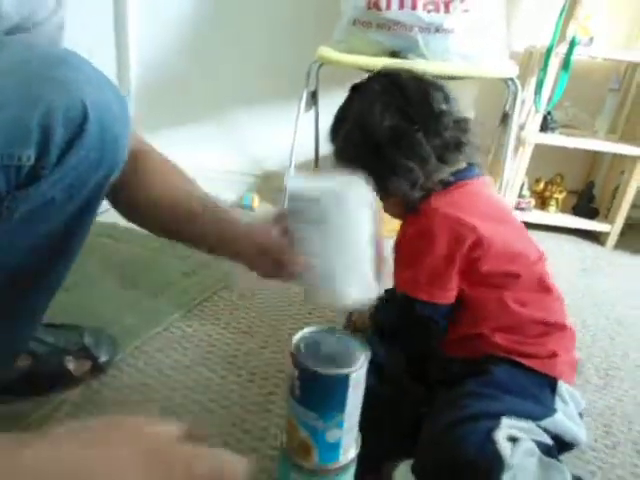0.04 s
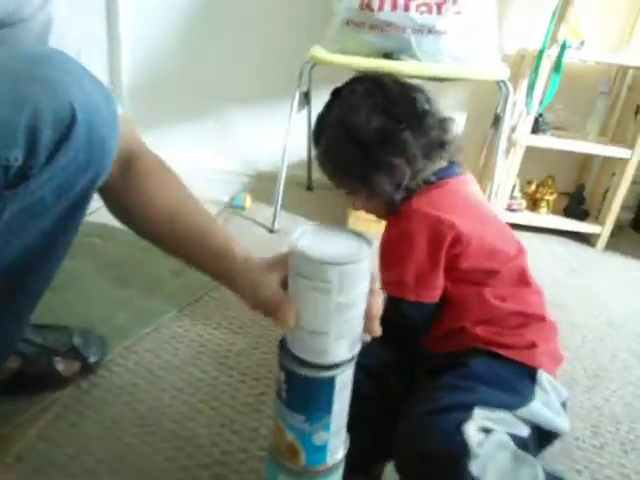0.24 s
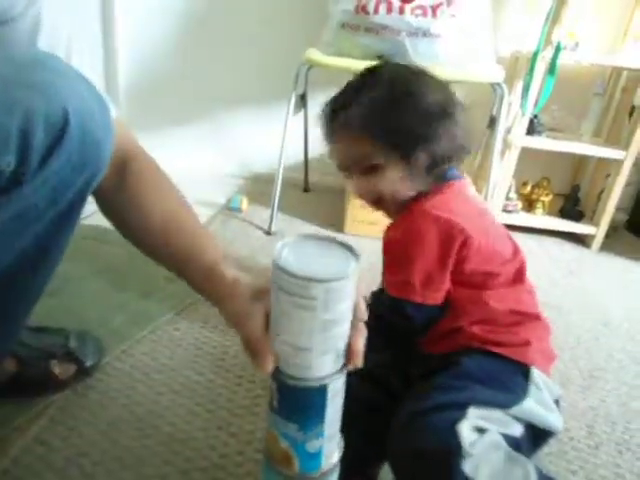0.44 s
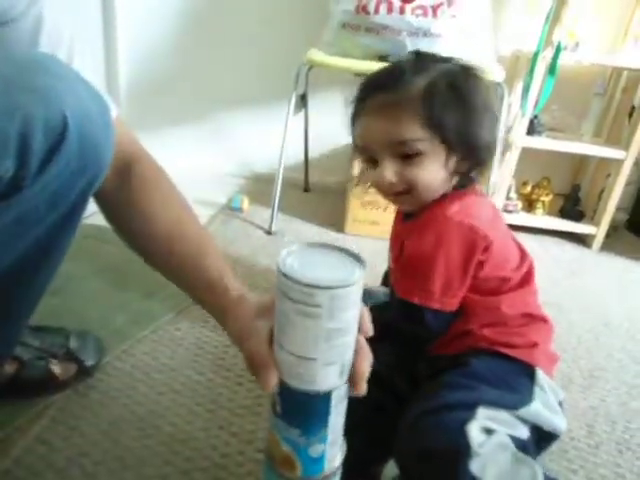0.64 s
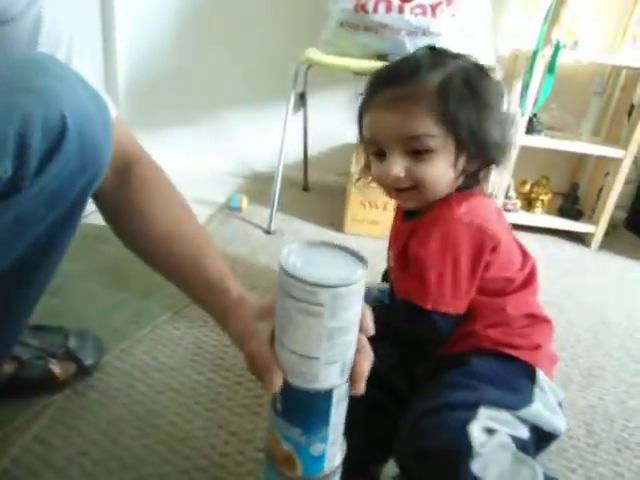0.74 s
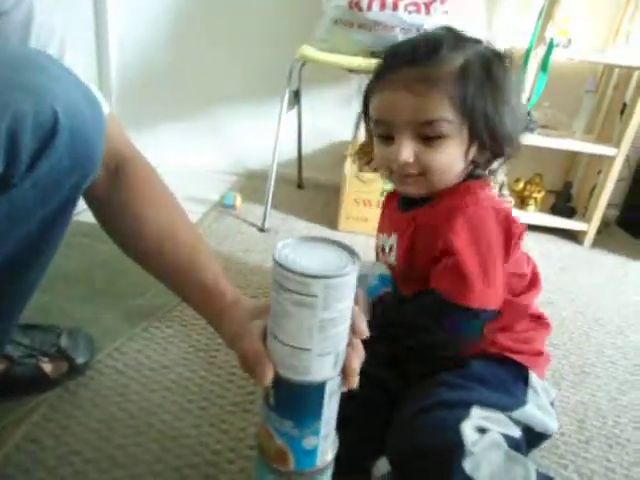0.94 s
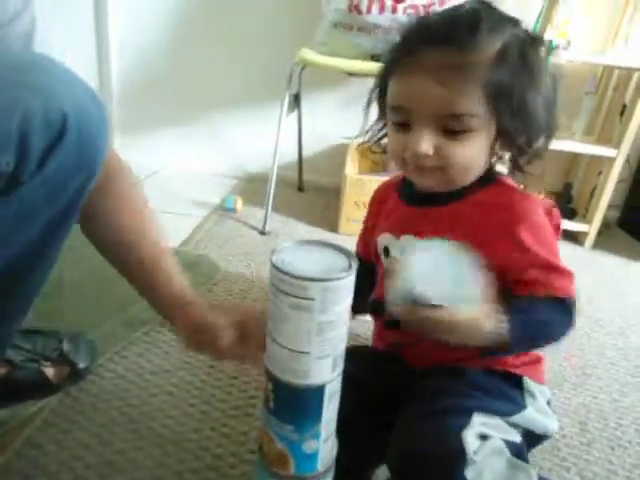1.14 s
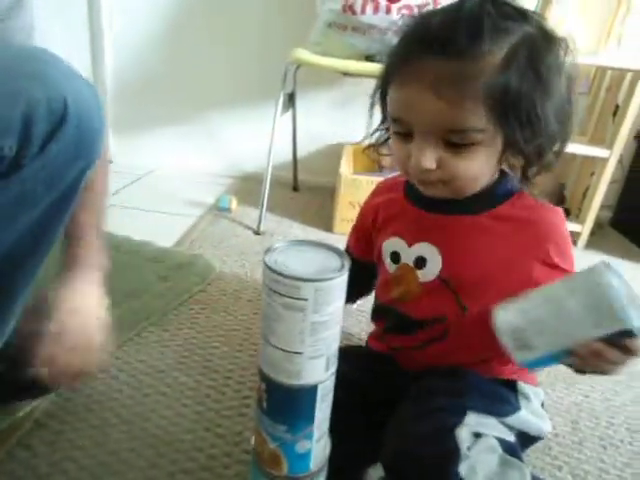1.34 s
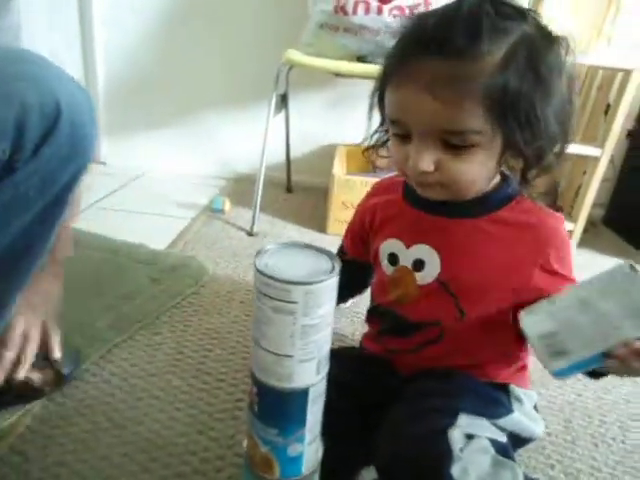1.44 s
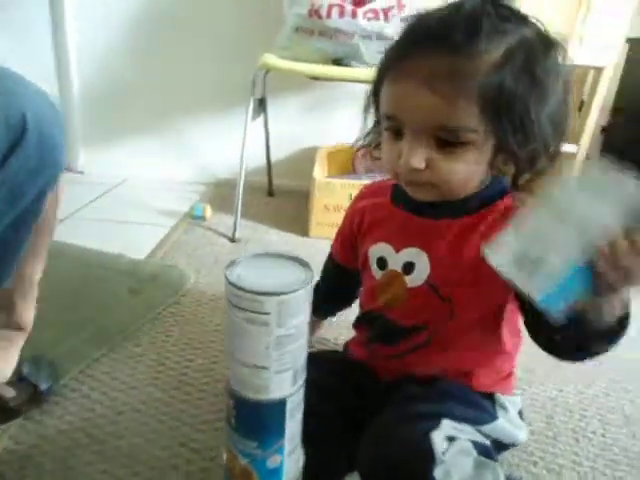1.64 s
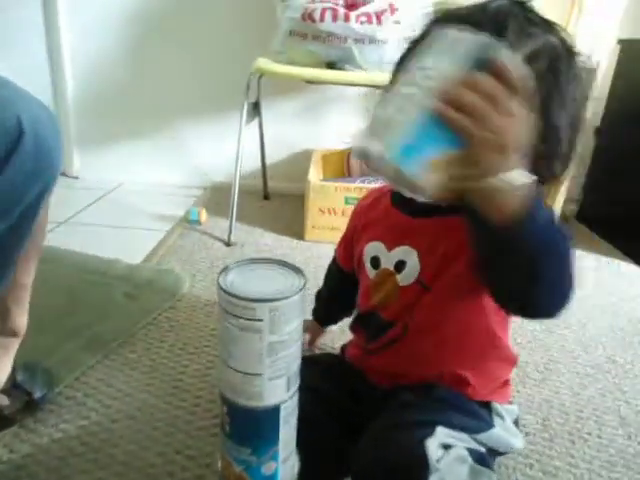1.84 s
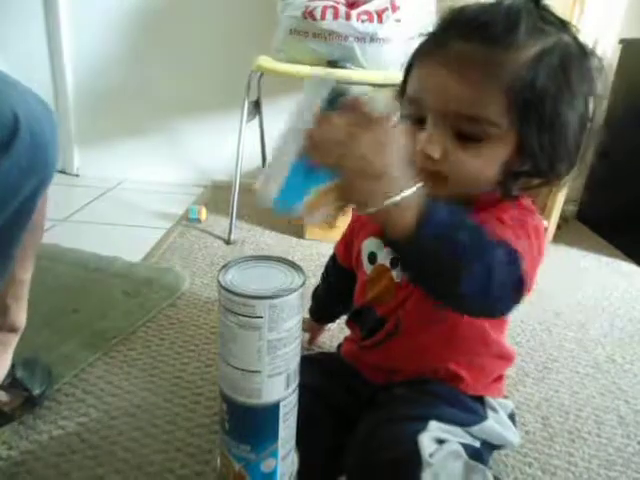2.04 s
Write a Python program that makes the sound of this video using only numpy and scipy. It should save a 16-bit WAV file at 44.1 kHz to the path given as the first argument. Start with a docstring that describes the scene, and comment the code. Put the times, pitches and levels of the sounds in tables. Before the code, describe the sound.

Close up in a carpeted room, one food can is stacked on another: bright clang, rapid rim taps, tiny rasp and dull knock, then soft rustling and ticks over rumbling air, captured by a distorting narrow-band microphone.

```python
"""In a carpeted room a low hum, rumbling air and a faint rustle of hands and clothes lie under light ticks.
Close to a small microphone that overloads, a food can lands on top of another with a clang of ringing modes.
Its rim chatters in a run of taps, slides with a rasp of tiny jerks, and drops into its seat with a dull knock.
Then only the faint rustle and ticks of handling remain over the hum."""
import sys
import numpy as np
from scipy import signal
from scipy.fft import rfft, irfft
from scipy.io import wavfile
from scipy.ndimage import uniform_filter1d

SR = 44100
rng = np.random.default_rng(int(sys.argv[2]) if len(sys.argv) > 2 else 0)


def inscribe(sig):
    """Save sig as 16-bit PCM at rate SR to the path in sys.argv[1].

    A 1-D sig is mono; a 2-D sig holds one channel per row.
    Samples are clipped to [-1, 1] before scaling.
    """
    pcm = np.round(np.clip(np.atleast_2d(sig).T, -1, 1) * 32767)
    wavfile.write(sys.argv[1], SR, pcm.astype(np.int16))


N = 92610  # samples, 2.1 s


def amp(db):
    """Decibels to gain."""
    return 10 ** (np.asarray(db) / 20)


def unit(x):
    """Scales to rms 1."""
    return x / np.sqrt(np.mean(x ** 2) + 1e-20)


def read(points, hz):
    """Reads a table on a log-frequency axis."""
    f, value = np.transpose(points)
    return np.interp(np.log(hz + 1), np.log(f + 1), value)


def colour(x, db_at):
    """Filters by a gain in dB given as a function of frequency."""
    hz = np.fft.rfftfreq(len(x), 1 / SR) + 1
    return irfft(rfft(x) * amp(db_at(hz)), len(x))


def noise(db_at):
    """Coloured noise of rms 1."""
    return unit(colour(rng.standard_normal(N), db_at))


def drift(rate_hz):
    """Slow random motion of rms 1."""
    return noise(lambda f: -10 * np.minimum(f / rate_hz, 10) ** 2)


def fade(t, t60):
    """Exponential decay by 60 dB in t60 seconds."""
    return np.exp(-np.log(1000) * t / t60)


def add(mix, s, sound):
    """Mixes a sound in at a time in seconds."""
    part = mix[max(round(s * SR), 0):][:len(sound)]
    part += sound[:len(part)]


def mic_db(f):
    """The microphone's steep loss of treble."""
    edge_hz, order = 5030, 17
    return -10 * np.log10(1 + (f / edge_hz) ** (2 * order))


def low_pass(x, hz, size):
    """A steep low-pass."""
    taps = signal.firwin(size, hz, window=("kaiser", 9), fs=SR)
    return signal.fftconvolve(x, taps, "same")


def air():
    """Background air of the room: steady noise that is heaviest in the bass."""
    # Spectrum of the air. Each row: frequency in Hz, relative level in dB per Hz.
    air_colour = [(8, 6.5), (22, 6), (45, -15.5), (92, 0), (150, -8.5), (190, -11.5), (280, -19.5),
                  (370, -16.5), (470, -24), (780, -26.5), (1200, -29), (2500, -39), (5000, -44.5)]
    level_db = -36.5
    return amp(level_db) * noise(lambda f: read(air_colour, f) + mic_db(f))


def hum():
    """Three low tones, each wavering at random in level and phase."""
    # Tones of the hum. Each row: frequency in Hz, rms level in dB.
    tones = [(59, -40.5), (123, -42), (144.5, -39.5)]
    waver_depth, waver_hz = .34, 8
    t, out = np.arange(N) / SR, np.zeros(N)
    for hz, db in tones:
        waver = 1 + waver_depth * (drift(waver_hz) + 1j * drift(waver_hz))
        carrier = np.exp(2j * np.pi * (hz * t + rng.random()))
        out += amp(db) * unit((waver * carrier).real)
    return out


def rustle():
    """Grainy friction of skin and cloth: coloured noise with a trembling level."""
    # Course of the rustle. Each row: time in seconds, level in dB before the grain.
    course = [(0, -49), (.5, -60), (.9, -61.5), (1.01, -54), (1.08, -59), (1.2, -55), (1.325, -49.5),
              (1.4, -55.5), (1.45, -51.5), (1.631, -46.5), (1.72, -58.5), (2.1, -64.5)]
    # Spectrum of the rustle. Each row: frequency in Hz, relative level in dB per Hz.
    rustle_colour = [(200, 2), (700, -1), (1500, -3.5), (3000, -4), (4600, -5), (5500, -1.5)]
    grain_db = 1  # rms
    smooth_db = np.interp(np.arange(N) / SR, *np.transpose(course))
    level_db = smooth_db + grain_db * drift(rate_hz=160)
    return amp(level_db) * noise(lambda f: read(rustle_colour, f) + mic_db(f))


def ticks():
    """Light contacts of fingers and metal: short noise bursts, of which the low ones last longer."""
    # Ticks of handling. Each row: start in seconds, level in dB, centre in Hz, width in octaves.
    contacts = [(0.153, -36.5, 1770, 3.1), (0.4674, -32, 1500, 1.03), (0.479, -45, 3500, 1.5),
                (0.5129, -31.5, 2500, 3.6), (0.5167, -32, 2500, 3), (0.542, -40.5, 4000, 1),
                (.681, -37, 3990, 1.5), (0.7143, -24.5, 3270, 4), (0.7196, -30.5, 3300, 1.8),
                (.812, -42.5, 2000, 1.17), (0.985, -33.5, 640, 0.46), (1.122, -42, 1470, 2.4),
                (1.3114, -30.5, 2100, 0.62), (1.434, -38, 4470, 0.9), (1.584, -38, 470, 0.65),
                (1.81, -42, 557, 0.53), (1.821, -41, 2340, 0.37)]
    shortest_t60_s, extra_cycles = 0.0041, 18
    t, out = np.arange(SR // 10) / SR, np.zeros(N)
    for s, db, hz, octaves in contacts:
        burst = noise(lambda f: mic_db(f) - 20 * np.log10(1 + (np.log2(f / hz) / octaves) ** 2))
        decay = fade(t, shortest_t60_s + extra_cycles / hz)
        add(out, s, amp(db) * burst[:len(t)] * decay)
    return out


def slide():
    """The rim slips over the lid in tiny jerks that rasp, and keeps one mode of the lid singing."""
    # Resonances rubbed by the rim. Each row: frequency in Hz, width in Hz, relative level in dB.
    rubbed = [(1190, 300, -1), (710, 220, -7.5), (2100, 200, -18.5), (3840, 900, -18.5), (5000, 300, -15.5)]
    start_s, end_s, press_rise_s = .593, .622, 0.019
    slips_per_s, rasp_db = 5000, -32
    sing_hz, sing_db, sing_rise_s, sing_t60_s = 1341, -25.5, 0.017, 0.055
    t = np.arange(N) / SR

    press = np.clip((t - start_s) / press_rise_s, 0, 1) * (t < end_s)
    slips = press * rng.standard_normal(N) * (rng.random(N) < slips_per_s / SR)
    rasp = np.zeros(N)
    for hz, width, db in rubbed:
        b, a = signal.iirpeak(hz, hz / width, SR)
        rasp += amp(db) * unit(signal.lfilter(b, a, slips))
    # the bands have rms 1 over the whole length, so the brief press must scale them down
    rasp = amp(rasp_db) * np.sqrt(press.mean()) * colour(rasp, mic_db)

    swell = np.clip((t - start_s) / sing_rise_s, 0, 1) ** 2
    swell *= fade(np.maximum(t - end_s, 0), sing_t60_s)
    sing = amp(sing_db) * swell * unit(np.sin(2 * np.pi * sing_hz * t))
    return sing + rasp


def blows(rows, shell_db, shell_t60, ring_share, order):
    """Blows on the can of the kind `order`: returns the clear modes and the dense short ring of its walls.

    Modes keep `ring_share` of their free ring time; brightness tilts a blow around 1500 Hz."""
    # Can modes. Each row: frequency in Hz, free ring time (t60) in seconds,
    # then level in dB in the landing clang, in a rim tap, in the seating knock.
    modes = [(425, 0.24, -36, -35.5, -17.5), (508.1, 0.22, -9.5, -55, -27),
             (600, 0.27, -17.5, -34.5, -15.5), (651.5, 0.38, -31.5, -21, -6.5), (680, 0.096, -13, -35, -12),
             (545, .05, -24.5, -23, -13.5), (812, 0.043, -9, -23.5, -12.5), (919, 0.031, -26.5, -19.5, -4),
             (1087, 0.046, -36.5, -12.5, -9.5), (1190, 0.067, -26, -18.5, -13),
             (1272.2, 0.11, 1.5, -15, -19), (1307.7, .22, -2.5, -31, -21), (1342.5, 0.2, 4, -11.5, -16.5),
             (1431, 0.075, 4, -10.5, -29), (1498, .14, 8, -33.5, -50), (1873, 0.35, -19.5, -40.5, -24.5),
             (1949, .12, -31.5, -34, -26), (2154, 0.28, -39, -27.5, -30.5), (2790, 0.47, -8.5, -35, -35.5),
             (3316, .07, -26, -27, -37), (3900, 0.047, -38, -29.5, -44), (4305, 0.11, -13.5, -45, -45.5),
             (4540, 0.16, -17.5, -43, -43), (4985, .09, -11, -29.5, -41)]
    # Dense ring of the can walls. Each row: frequency in Hz,
    # then relative level in dB per Hz in the clang, in a rim tap, in the knock.
    shell = [(104, -2, -2, -29.5), (297.3, 3.5, 0, 6.5), (650.5, 7, 5, 1.5), (1260, -4, 10, -1.5),
             (1770, -4.5, -21, -13), (1991, -4.5, 7.5, -2.5), (2500, -4, -1, -22), (3750, -10, -7.5, -28),
             (5390, -16, -11, -40)]
    wall_colour = [(hz, levels[order]) for hz, *levels in shell]
    t, out = np.arange(SR * 3 // 4) / SR, np.zeros((2, N))
    for s, db, bright in rows:
        tilt = lambda f: bright * np.log2(np.maximum(f, 400) / 1500)
        ring = np.zeros(len(t))
        for k, (hz, t60, *levels) in enumerate(modes):
            level = (-1) ** k * amp(levels[order] + tilt(hz))  # neighbours start in opposite phase
            ring += level * fade(t, t60 * ring_share) * np.sin(2 * np.pi * hz * t)
        wall = noise(lambda f: read(wall_colour, f) + tilt(f) + mic_db(f))
        add(out[0], s, amp(db) * ring)
        add(out[1], s, amp(db + shell_db) * wall[:len(t)] * fade(t, shell_t60))
    return out


def knock():
    """The can drops into its seat in a few quick knocks, damped where the cans touch."""
    # Seating knocks. Each row: start in seconds, level in dB, brightness in dB per octave.
    knocks = [(.6242, 2, 5), (.6315, -2.5, 1.5), (.637, -8.5, -3.5), (.6495, -21, 10.5), (.656, -16.5, 5)]
    return blows(knocks, shell_db=-10, shell_t60=0.037, ring_share=0.53, order=2)


def chatter():
    """The rim chatters on the can below in a run of taps, damped where the cans touch."""
    # Rim taps. Each row: start in seconds, level in dB, brightness in dB per octave.
    rim_taps = [(.3475, -7.5, 6.5), (.3575, -5, 0), (.3645, -4, -2.5), (.3685, -8.5, 0),
                (.3745, -13.5, 9.5), (.381, -15.5, 9), (.4005, -14.5, 3.5), (.426, -30, 8)]
    return blows(rim_taps, shell_db=-12.5, shell_t60=0.045, ring_share=0.52, order=1)


def clang():
    """The can lands on one edge and rings until its rim comes down again and chokes the clang."""
    landing_s, landing_db = .2012, 2.5
    touchdown_s, choke_t60_s = .345, 0.27
    choke = fade(np.maximum(np.arange(N) / SR - touchdown_s, 0), choke_t60_s)
    landing = [(landing_s, landing_db, 0)]
    return choke * blows(landing, shell_db=-3.5, shell_t60=0.12, ring_share=0.86, order=0)


def room(x):
    """A diffuse tail of the carpeted room: noise with each band dying at its own speed."""
    # Reverberation. Each row: frequency in Hz, decay time (t60) in seconds.
    room_t60 = [(100, 0.43), (600, 0.39), (1400, 0.43), (2500, 0.4), (5500, 0.3)]
    delay_s = .004
    hz, t, bands = signal.stft(rng.standard_normal(SR), SR, nperseg=256)
    dying = bands * fade(t, read(room_t60, hz)[:, None])
    tail = signal.istft(dying, SR, nperseg=256)[1]
    out = np.zeros(N)
    add(out, delay_s, signal.fftconvolve(x, tail / np.linalg.norm(tail)))
    return out


def scene():
    """Clang, chatter, slide and knock, with the room and its background."""
    room_modes_db, room_walls_db = -14.5, -11
    modes, walls = clang() + chatter() + knock()
    ringing = modes + slide()
    contacts = walls + ticks()
    echo = room(amp(room_modes_db) * ringing + amp(room_walls_db) * contacts)
    return (ringing + contacts + echo + rustle() + hum() + air())[None]


def record(dry):
    """A narrow-band input clips on loud blows; its overshoots clip again and mirror around its low sampling rate."""
    clip_level, ceiling = .68, .69  # of full scale
    input_edge_hz, input_rate_hz, mirror_db, edge_hz = 5700, 11025, 2, 15900
    clipped = np.clip(dry[0], -clip_level, clip_level)
    x = low_pass(clipped, input_edge_hz, size=151)  # the filter rings past the ceiling
    overshoot = x - np.clip(x, -ceiling, ceiling)
    mirror = amp(mirror_db) * np.cos(2 * np.pi * input_rate_hz * np.arange(N) / SR)
    removed = uniform_filter1d(overshoot * (1 + mirror), size=2)
    return low_pass(x - removed, edge_hz, size=511)[None]


dry = scene()
out = record(dry)
inscribe(out)
```